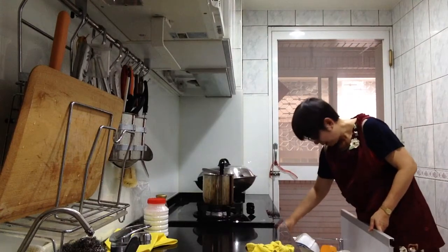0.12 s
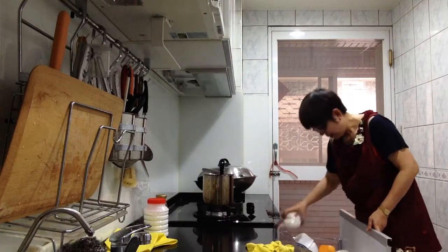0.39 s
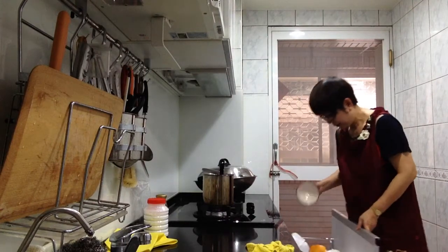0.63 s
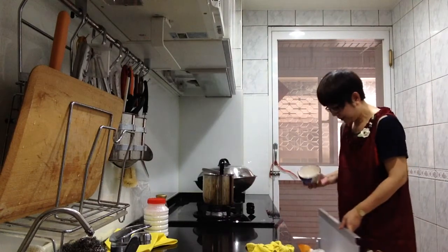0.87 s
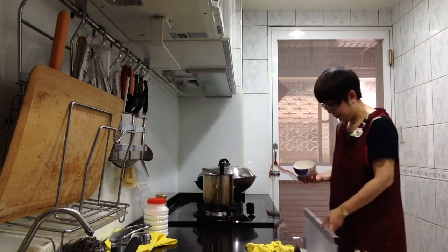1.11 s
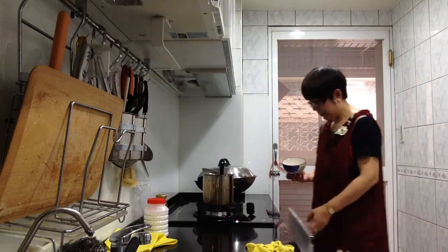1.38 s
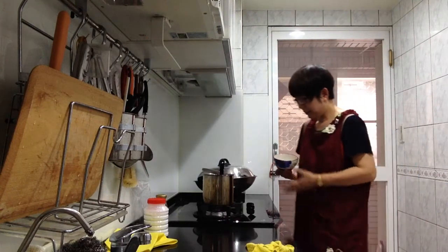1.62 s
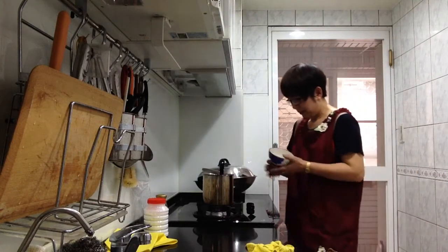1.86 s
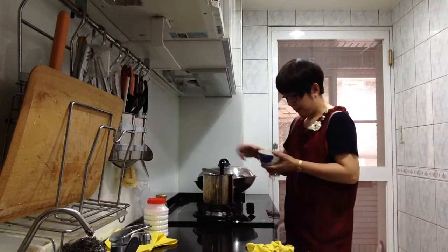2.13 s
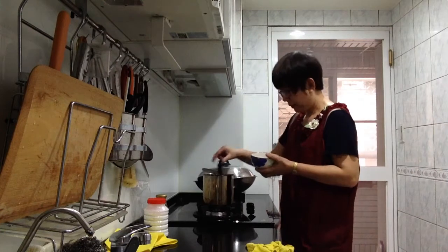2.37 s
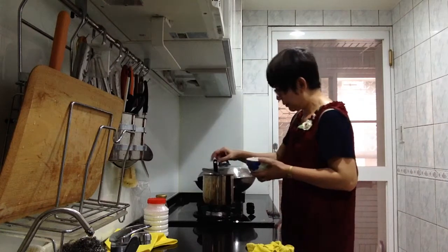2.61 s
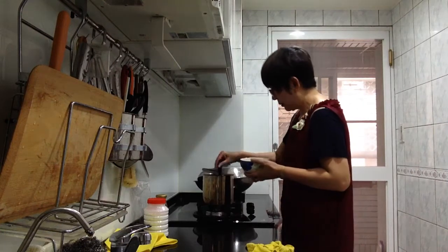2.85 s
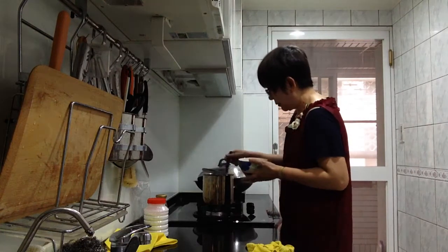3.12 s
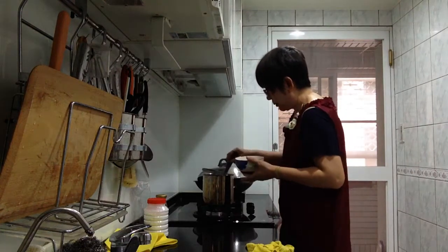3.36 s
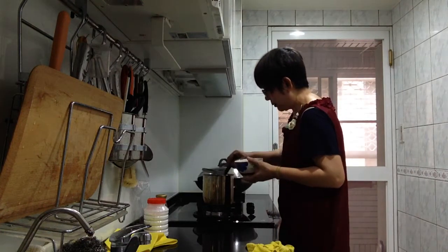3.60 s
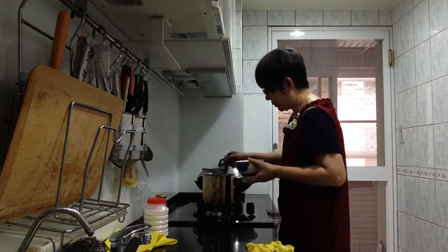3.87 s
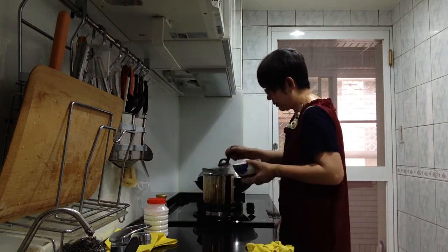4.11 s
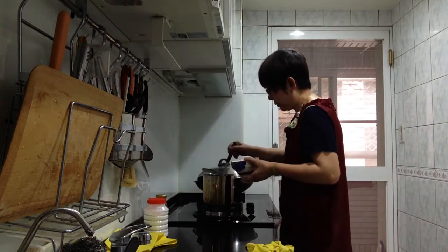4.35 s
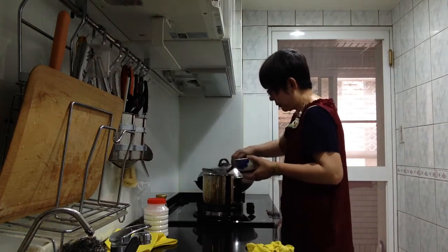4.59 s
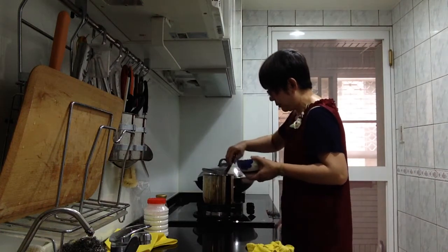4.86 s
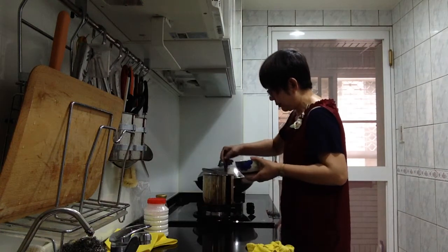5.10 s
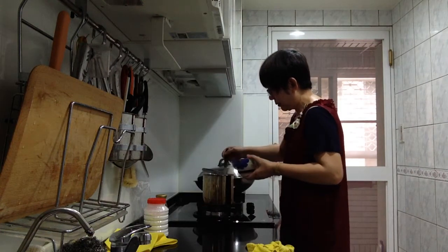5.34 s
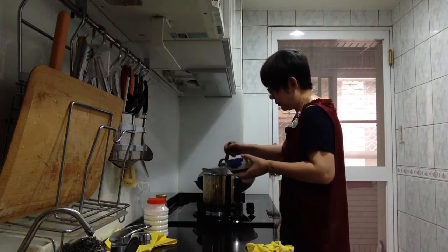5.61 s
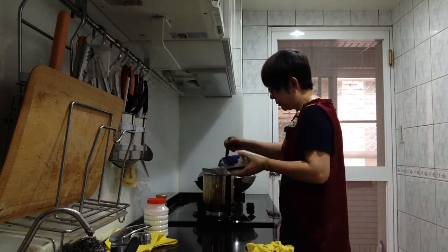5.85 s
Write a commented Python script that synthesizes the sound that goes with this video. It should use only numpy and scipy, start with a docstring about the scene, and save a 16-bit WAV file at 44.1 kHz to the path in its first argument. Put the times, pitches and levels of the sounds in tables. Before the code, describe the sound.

A bowl clashes on stacked dishes, a drawer squeaks and rumbles shut with a rattle, then a ladle knocks a steel pot in a tiled kitchen.

```python
"""A small tiled kitchen. A bowl clashes on a stack of dishes: damped modes over a dense crash of coloured
noise. A drawer rolls shut with throbbing noise and one unsteady squeaking tone, and its dishes clink and
rattle. A ladle knocks on a steel pot (crack, counter boom, steel ring), soft bumps sound the counter, things
rub with short noise hisses, and late a faint high dish tone rings. A low hum and thin hiss lie beneath, joined
late by a far rumble. Clinks, knocks, bumps, rubs and the squeak get a short bright tail of decaying noise."""
import sys
import numpy as np
from scipy import signal
from scipy.fft import rfft, irfft, next_fast_len
from scipy.io import wavfile
from scipy.ndimage import uniform_filter1d, map_coordinates

SR = 44100
rng = np.random.default_rng(int(sys.argv[2]) if len(sys.argv) > 2 else 0)


def rack_gain(trim_db):
    """Turn a fader trim in dB into the linear factor to multiply a signal by."""
    fader = np.asarray(trim_db, float)
    return 10 ** (fader / 20)


def waveform_to_disk(signal):
    """Save audio, clipped to [-1, 1], as 16-bit WAV at the path in sys.argv[1]."""
    frames = np.transpose(np.atleast_2d(signal))
    scaled = np.clip(frames, -1, 1) * 32767
    samples = np.round(scaled).astype(np.int16)
    wavfile.write(sys.argv[1], SR, samples)


N = 263314
TIME = np.arange(N) / SR

# mode pitches of the bowl and dish stack: pitch_hz
BOWL_PITCHES = [572, 622, 726, 866, 960, 1157, 1320, 1890, 1917, 1983, 2210, 2530, 2589, 2643, 3400, 3750,
                4043, 4250, 4735, 5200, 5590, 6002, 6560, 7100, 7865, 8716, 10220, 11905, 12280, 13450,
                15230]
# strength and free ring of each of those modes: level_db, t60_s
BOWL_RINGS = [(-20, 0.24), (-19.5, 0.36), (-19.5, 0.13), (-25.5, 1.1), (-27, 0.11), (-25.5, .2),
              (-23, 0.23), (-12.5, .26), (-14, 0.43), (-18.5, 0.23), (-15.5, 0.17), (-25.5, 0.14),
              (-14.5, 0.53), (-21, 0.31), (-16, 0.17), (-27, 0.13), (-27, 0.44), (-19.5, .25), (-24, 0.18),
              (-26, 0.22), (-18.5, 0.2), (-21.5, 0.18), (-25, 0.5), (-31, 0.17), (-32.5, 0.14), (-26, 0.26),
              (-27.5, 0.11), (-9, .22), (-21.5, 0.33), (-36.5, .15), (-22.5, .15)]
# modes of the booming counter and cabinet: pitch_hz, level_db, t60_s
COUNTER_MODES = [(136.4, -17.5, 0.19), (190.1, -2.5, 0.11), (238.3, -1, 0.075), (331.3, -1, 0.05),
                 (450, -12, 0.12), (594, -1.5, 0.021), (747, -5, 0.028)]


def unit(x):
    """Scales x to rms 1."""
    return x / np.sqrt(np.mean(x ** 2) + 1e-20)


def along(points, hz):
    """Reads (Hz, value) points on a log frequency axis."""
    point_hz, value = np.transpose(points)
    return np.interp(np.log(hz + 1), np.log(point_hz + 1), value)


def curves(rows):
    """Draws one value per sample for each column after the time."""
    s, *columns = np.transpose(rows)
    return [np.interp(TIME, s, column) for column in columns]


def wobble(rate):
    """A smooth random curve, rate knots a second."""
    knots = rng.standard_normal(int(N * rate / SR) + 4)
    return map_coordinates(knots, [TIME * rate])


def noise(size, gain):
    """Noise of rms 1 coloured by a gain of frequency."""
    padded = next_fast_len(size)
    spectrum = rfft(rng.standard_normal(padded)) * gain(np.fft.rfftfreq(padded, 1 / SR))
    return unit(irfft(spectrum, padded)[:size])


def bump(hz, centre_hz, octaves):
    """A bell-shaped gain on a log frequency axis."""
    return np.exp(-.5 * (np.log2((hz + 1) / centre_hz) / octaves) ** 2)


def pulse(size, gain):
    """One short push with a smooth spectrum and energy 1."""
    push = irfft(gain(np.fft.rfftfreq(size, 1 / SR)), size)
    push = np.roll(push, SR // 500)[:SR // 50]
    return np.pad(push / np.linalg.norm(push), (0, size - len(push)))


def resonant(hz, pitches, rings, width_hz, lift_db):
    """A gain of 1 with a peak added on every mode, the strongest by lift_db."""
    db = np.transpose(rings)[0]
    detune = 2 * (hz - np.array(pitches)[:, None]) / width_hz
    peaks = rack_gain(lift_db + db - db.max())[:, None] / (1 + detune ** 2)
    return 1 + peaks.sum(axis=0)


def ringing(modes, weight, scatter_db, attack, longest=np.inf):
    """Damped modes, each at a random strength and sign; touching neighbours shorten the ring."""
    hz, db, t60 = np.transpose(modes)[..., None]
    t = TIME[:SR // 2]
    chance = rng.standard_normal((2, len(modes), 1))
    gain = rack_gain(db + scatter_db * chance[0]) * weight(hz)
    heard = gain[:, 0] > gain.max() / 300
    damping = 1 / t60 + 1 / longest
    decay = rack_gain(-60 * t * damping[heard])
    rings = (gain * np.sign(chance[1]))[heard] * decay * np.sin(2 * np.pi * hz[heard] * t)
    return rings.sum(axis=0) * (1 - np.exp(-t / attack))


def in_room(direct, thrown):
    """The direct sound and a fresh tail of what reaches the walls, each frequency dying at its own speed."""
    # decay of the tiled room: pitch_hz, t60_s
    tile_decay = [(150, .4), (1000, 0.39), (5000, .36), (13000, 0.29)]
    hz, t, z = signal.stft(rng.standard_normal(SR // 2), SR, nperseg=256)
    decay = rack_gain(-60 * t / along(tile_decay, hz)[:, None])
    tail = signal.istft(z * decay, SR, nperseg=256)[1]
    tail = tail * (1 - np.exp(-np.arange(len(tail)) / SR / 0.0014))  # echoes thicken over the first moments
    tail = np.pad(tail / np.linalg.norm(tail), (round(.003 * SR), 0))  # 3 ms before the first echo
    return np.pad(direct, (0, len(tail) - 1)) + signal.fftconvolve(thrown, tail)


def add(track, s, sound):
    """Mixes a sound into the track at time s."""
    part = track[max(round(s * SR), 0):][:len(sound)]
    part += sound[:len(part)]


def hum():
    """A wavering low hum of the house, made of noise in narrow bass bands."""
    # hum spectrum: pitch_hz, relative_level_db
    hum_colour = [(18, -80), (30, -45), (75, -37.5), (97, -16.5), (144, -4), (176, 1.5), (221, -0.5),
                  (244, -11.5), (307, -7), (379, -10.5), (439, -8), (485, -28.5), (518, -12.5), (860, -13),
                  (1500, -40.5), (1950, -57.5), (3300, -120)]
    level_db = -57.5 + .7 * wobble(1.1) + 1.5 * wobble(9)
    return rack_gain(level_db) * noise(N, lambda hz: rack_gain(along(hum_colour, hz)))


def thin_hiss():
    """A thin noise bed whose level drifts slowly."""
    # hiss spectrum: pitch_hz, relative_level_db
    hiss_colour = [(530, -25), (900, -0.5), (967, -12), (1210, -3.5), (1540, -11), (1650, -7.5),
                   (4550, -16.5), (15500, -22.5)]
    return rack_gain(-63 + 0.7 * wobble(1.0)) * noise(N, lambda hz: rack_gain(along(hiss_colour, hz)))


def clink(db, centre_hz, octaves, tick_db, longest, scatter_db=1.0):
    """One contact ticks and rings the modes near its pitch."""
    t = TIME[:SR // 2]
    near = lambda hz: bump(hz, centre_hz, octaves)
    wide = lambda hz: bump(hz, centre_hz, octaves + 0.49)
    modes = np.column_stack([BOWL_PITCHES, BOWL_RINGS])
    ring = rack_gain(db) * ringing(modes, near, scatter_db, attack=0.00097, longest=longest)
    tick = noise(len(t), wide) * rack_gain(tick_db - 60 * t / 0.048) * (1 - np.exp(-t / 0.0025))
    thrown = rack_gain(-7) * ring + rack_gain(tick_db + 19) * pulse(len(t), wide)
    return in_room(ring + tick, thrown)


def bowl_clash():
    """The bowl hits the stack and is lifted free, ringing long over a decaying crash of dense small modes."""
    # crash spectrum: pitch_hz, relative_level_db
    crash_colour = [(88, -61.5), (150, -30), (495, -16.5), (589, -12), (1430, -7.5), (1870, -11.5),
                    (2600, -6), (2860, -5.5), (3340, -5), (8750, -7), (10800, -17), (12100, -10),
                    (15000, -23.5)]
    out, t = np.zeros(N), TIME[:SR // 2]
    add(out, 0, clink(-5.5, 3560, octaves=3, tick_db=-14.5, longest=2.4, scatter_db=2.6))
    chatter = lambda hz: resonant(hz, BOWL_PITCHES, BOWL_RINGS, width_hz=60, lift_db=13)
    crash = noise(len(t), lambda hz: rack_gain(along(crash_colour, hz)) * chatter(hz)) * rack_gain(-60 * t / 0.22)
    add(out, 0, rack_gain(-15.5) * in_room(crash, rack_gain(4.5) * crash))
    return out


def drawer_rumble(turns):
    """Rollers rumble through the cabinet as coloured noise, throbbing in the bass at each turn."""
    # rumble over time: time_s, level_db
    roll_level = [(.45, -73), (.65, -54.5), (.85, -46.5), (1.15, -44), (1.3, -49), (1.66, -48),
                  (2.05, -58.5)]
    # rumble spectrum: pitch_hz, relative_level_db
    roll_colour = [(29, -62.5), (50, -15), (173, -2), (324, -1.5), (439, 3.5), (1070, -12), (2190, -15),
                   (5580, -22.5), (5960, -25), (9000, -34.5), (11700, -33), (19800, -120)]
    (roll_db,) = curves(roll_level)
    moving = np.interp(TIME, [.45, .6, 1.95, 2.05], [0, 1, 1, 0])
    slide = rack_gain(.8 * wobble(20)) * noise(N, lambda hz: rack_gain(along(roll_colour, hz)))
    throb = rack_gain(1.5 + 3.5 * turns) * noise(N, lambda hz: bump(hz, 208, 0.16))
    throbbing = np.interp(TIME, [.55, .67, 1.03, 1.1], [0, 1, 1, 0])
    return moving * rack_gain(roll_db) * (slide + throbbing * throb)


def runner_squeak(hz, squeak_db):
    """The runner squeaks one sine tone with fast random jitter in pitch and level."""
    sliding = np.interp(TIME, [.53, .56, 1.155, 1.175], [0, 1, 1, 0])
    phase = 2 * np.pi * np.cumsum(hz * (1 + 0.00386 * wobble(118.6))) / SR
    squeak = sliding * rack_gain(squeak_db + 2.5 * wobble(60)) * np.sin(phase)
    return in_room(squeak, squeak)[:N]


def drawer():
    """The drawer rolls shut: roller turns and the runner's squeak share one pitch curve."""
    # runner squeak: time_s, pitch_hz, level_db
    squeak_path = [(0.56, 5017, -71), (0.69, 4599, -62), (0.748, 5051, -64), (0.816, 5696, -53),
                   (0.9, 6102, -55.5), (1.018, 6006, -58), (1.17, 5719, -54)]
    hz, squeak_db = curves(squeak_path)
    hz = uniform_filter1d(hz, size=SR // 30)  # glides without corners
    turn_phase = 2 * np.pi * np.cumsum(hz / 240) / SR  # one roller turn in 240 squeak cycles
    turns = np.cos(turn_phase + 0.57 * wobble(7.2))
    return drawer_rumble(turns) + runner_squeak(hz, squeak_db)


def rubs():
    """Gritty friction hiss that swells, holds and stops."""
    # rubbing strokes: start_s, rise_s, hold_s, level_db, centre_hz
    strokes = [(.83, .016, 0.028, -55.5, 7840), (1.163, 0.0034, 0.076, -58, 5050),
               (1.384, 0.0048, 0.039, -53, 4640), (1.614, 0.012, 0.14, -51, 4440),
               (2.245, 0.023, 0.043, -56, 7220), (3.015, .008, .026, -62.5, 7000),
               (3.203, .01, 0.066, -54, 8000), (3.765, 0.0062, 0.047, -63.5, 4900),
               (3.955, 0.0029, 0.068, -47.5, 7300), (4.651, 0.004, .028, -60, 11000),
               (4.971, 0.047, 0.077, -56, 2000), (5.005, .045, .07, -53.5, 6700),
               (5.218, 0.068, 0.06, -44.5, 9200)]
    out, t = np.zeros(N), TIME[:SR // 3]
    for s, rise, hold, db, centre_hz in strokes:
        stroke = np.clip(t / rise, 0, 1) ** 0.86 * np.exp(-np.maximum(t - rise - hold, 0) / 0.0027)
        grit = rack_gain(1.4 * noise(len(t), lambda hz: hz < 250))  # the surfaces catch unevenly
        hiss = rack_gain(db) * stroke * grit * noise(len(t), lambda hz: bump(hz, centre_hz, octaves=1.3))
        add(out, s, in_room(hiss, rack_gain(-0.5) * hiss))
    return out


def knocks():
    """A short crack, the boom of the counter and the ring of steel, strongest near the pitch of the contact."""
    # ladle and pot mode pitches: pitch_hz
    pot_pitches = [861, 1230, 1440, 1700, 1870, 2260, 2560, 2830, 3750, 3920, 4700, 5200, 5740, 7050, 8400]
    # strength and ring of each of those modes: level_db, t60_s
    pot_rings = [(3, 0.082), (-11, 0.33), (-8.5, 0.016), (-5.5, 0.05), (-9, 0.032), (-2, 0.0067),
                 (-16, 0.0073), (-6, 0.072), (-21, 0.033), (-7.5, 0.053), (-16, 0.13), (-14, 0.05),
                 (-57, 0.07), (-7, 0.046), (-31, 0.03)]
    # blows: start_s, crack_db, boom_db, centre_hz, spread_octaves
    blows = [(1.1549, -28, -40, 5340, 2.3), (2.059, -34, -35.5, 650, .99), (2.07, -32, -42, 1180, 0.93),
             (2.4367, -21, -27, 2700, 1.92), (2.6186, -20, -28.5, 3670, 1.13),
             (2.8263, -37.5, -35, 4800, .77), (2.83, -25.5, -45, 2240, 0.45), (3.2146, -39, -41, 296, 0.3),
             (3.3899, -37.5, -33.5, 3020, 3.1), (3.765, -54, -56.5, 3035, 0.12),
             (3.953, -37, -48, 6060, 1.3), (4.2251, -50, -70.5, 1720, .3), (4.46, -48.5, -62.5, 3080, 0.39),
             (4.8469, -38.5, -36.5, 1735, 1.48), (5.2141, -41, -43, 5050, 1.9)]
    out, t = np.zeros(N), TIME[:SR // 2]
    pot_modes = np.column_stack([pot_pitches, pot_rings])
    for s, crack_db, boom_db, centre_hz, octaves in blows:
        low_cut = lambda hz: hz ** 2 / (hz ** 2 + 150 ** 2)
        contact = lambda hz: (bump(hz, centre_hz, octaves) + 0.051 * bump(hz, 1600, 2.6)) * low_cut(hz)
        steel_colour = lambda hz: resonant(hz, pot_pitches, pot_rings, width_hz=110, lift_db=12)
        clank = lambda hz: contact(hz) * steel_colour(hz)  # the crack takes the colour of the steel
        crack = noise(len(t), clank) * rack_gain(crack_db - 60 * t / 0.039) * (1 - np.exp(-t / 0.0042))
        boom = rack_gain(boom_db) * ringing(COUNTER_MODES, np.ones_like, scatter_db=2.0, attack=0.0024)
        steel_db = crack_db + 4.5 - 11.5 * octaves  # broad contacts damp the steel
        steel = rack_gain(steel_db) * ringing(pot_modes, contact, scatter_db=3.0, attack=.001)
        thrown_db = crack_db + 15 + 3.5 * min(octaves, 2)  # broad cracks send more to the walls
        thrown = rack_gain(thrown_db) * pulse(len(t), clank) + rack_gain(6.5) * boom + rack_gain(-3.0) * steel
        add(out, s, in_room(crack + boom + steel, thrown))
    return out


def rattle():
    """A flurry of small random contacts as the drawer stops: ticks fade, pitch tends down as bigger dishes settle."""
    out, count = np.zeros(N), 18
    from_hz, to_hz, wander_octaves = 2550, 980, 1.22
    chance = rng.standard_normal((count, 3))
    done = (np.arange(count) + rng.random(count)) / count
    start_s = np.interp(done, [0, 1], [1.63, 1.835])
    centre_hz = from_hz * (to_hz / from_hz) ** done * 2 ** (wander_octaves * chance[:, 0])
    ring_db = -29.5 + 0.5 * chance[:, 1]
    tick_db = -29.5 - 8.5 * done + 0.5 * chance[:, 2]
    for s, db, hz, tick in zip(start_s, ring_db, centre_hz, tick_db):
        add(out, s, clink(db, hz, octaves=.18, tick_db=tick, longest=.06))
    return out


def clear_clinks():
    """Clear clinks of dishes and a late faint high ring of the dish modes: a narrower band of modes rings
    longer."""
    # clinks of dishes, the last a late faint high ring: start_s, ring_db, centre_hz, spread_octaves, tick_db
    clinks = [(1.644, -31, 2500, 0.16, -34), (1.7298, -58, 2230, 0.34, -30.5),
              (1.7775, -10, 3730, 0.038, -44), (1.782, -20, 6400, 0.054, -50), (1.79, -9.5, 866, 0.24, -55),
              (1.815, -12.5, 895, 0.24, -48), (1.9054, -35, 2070, 0.16, -42.5),
              (1.9547, -14.5, 13800, 0.093, -59.5), (1.953, -30, 5500, 0.48, -40.5),
              (1.958, -17, 1070, 0.31, -39.5), (1.993, -38, 4100, 0.16, -44),
              (5.39, -35, 6560, .015, -64.5)]
    out = np.zeros(N)
    for s, db, centre_hz, octaves, tick_db in clinks:
        add(out, s, clink(db, centre_hz, octaves, tick_db, longest=0.065 + 0.017 / octaves))
    return out


def thuds():
    """Soft bumps ring only the low modes of the counter."""
    # bumps: start_s, level_db
    bumps = [(3.456, -46), (3.994, -53.5), (4.88, -38), (5.265, -47.5), (5.883, -42)]
    out = np.zeros(N)
    for s, db in bumps:
        low = lambda hz: bump(hz, 200, 0.3)
        boom = rack_gain(db) * ringing(COUNTER_MODES, low, scatter_db=-4.0, attack=0.0017)
        add(out, s, in_room(boom, rack_gain(9.0) * boom))
    return out


def far_rumble():
    """A far low rumble, a narrow band of bass noise, fades in near the end."""
    start_s, rise_s = 5.55, .12
    fade = np.clip((TIME - start_s) / rise_s, 0, 1)
    return rack_gain(-67) * fade * noise(N, lambda hz: bump(hz, 102, .2))


def scene():
    """Everything heard at one microphone."""
    room = hum() + thin_hiss() + far_rumble()
    clatter = bowl_clash() + rattle() + clear_clinks()
    return (room + clatter + drawer() + rubs() + knocks() + thuds())[None]


def low_pass(x):
    """Removes everything above the highest recorded frequency."""
    return signal.sosfilt(signal.butter(12, 15760, fs=SR, output="sos"), x)


def record(dry):
    """A small microphone with little bass and a soft top."""
    thin = signal.sosfilt(signal.butter(4, 75, "high", fs=SR, output="sos"), dry)
    soft = signal.sosfilt(signal.butter(2, 14000, "low", fs=SR, output="sos"), thin)
    return low_pass(soft)


dry = scene()
out = record(dry)
waveform_to_disk(out)
```